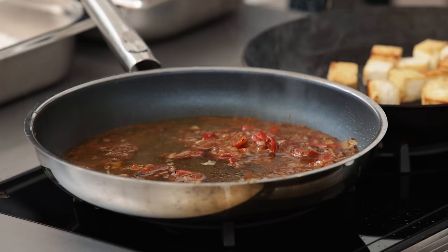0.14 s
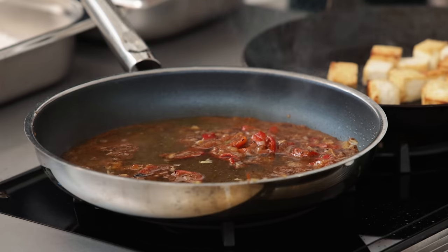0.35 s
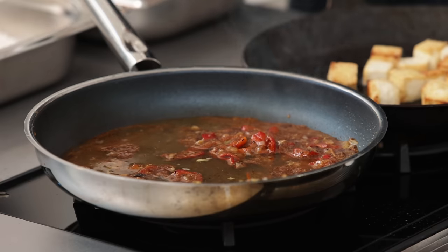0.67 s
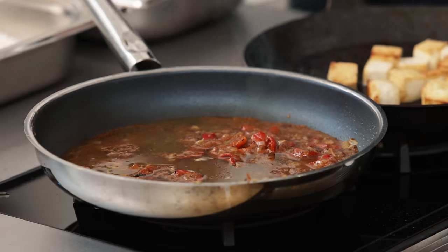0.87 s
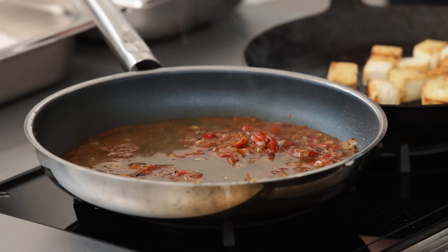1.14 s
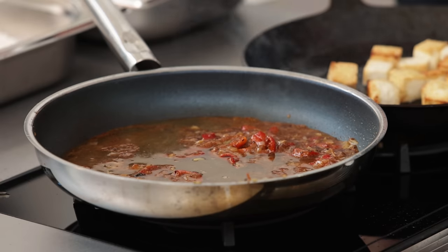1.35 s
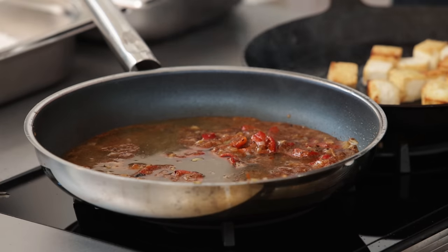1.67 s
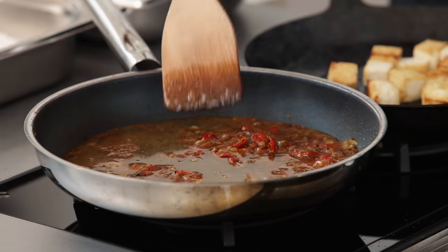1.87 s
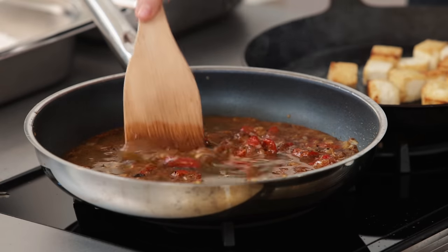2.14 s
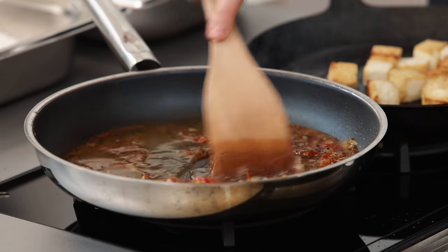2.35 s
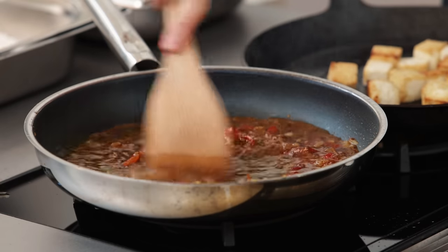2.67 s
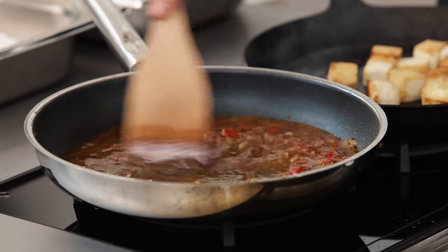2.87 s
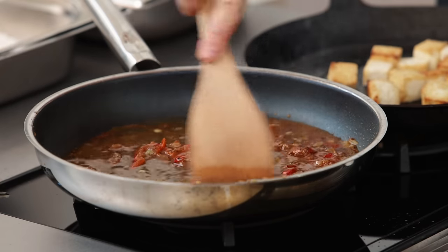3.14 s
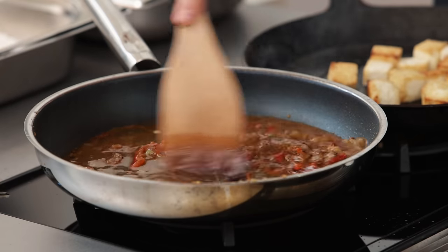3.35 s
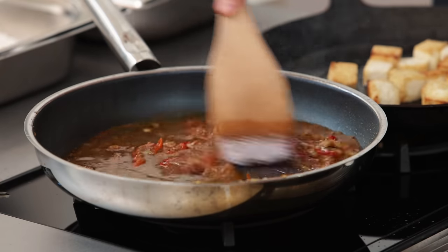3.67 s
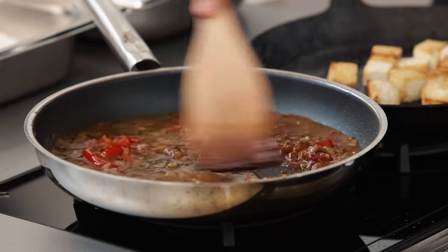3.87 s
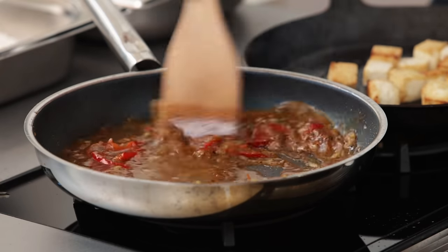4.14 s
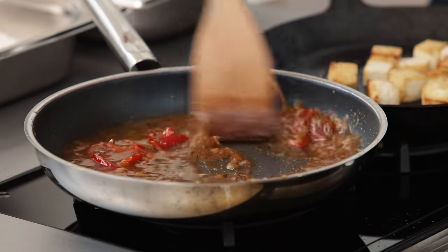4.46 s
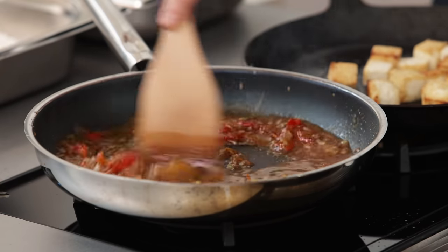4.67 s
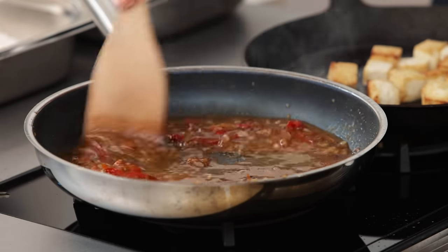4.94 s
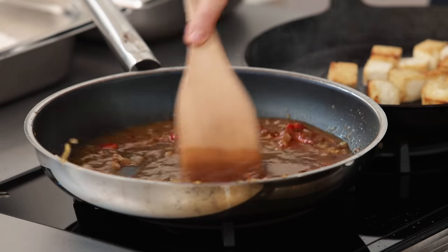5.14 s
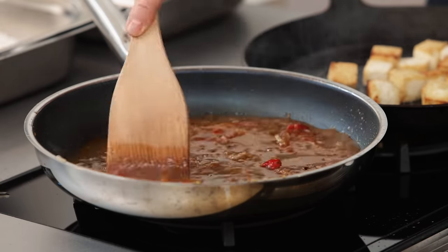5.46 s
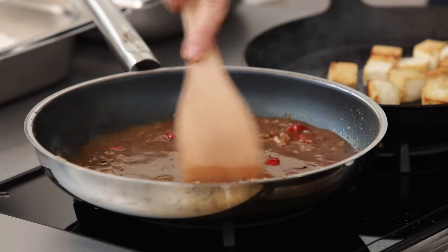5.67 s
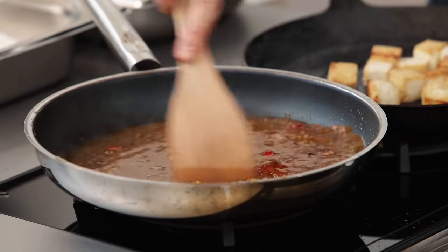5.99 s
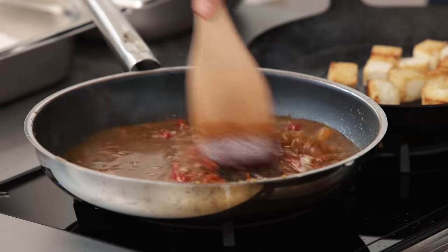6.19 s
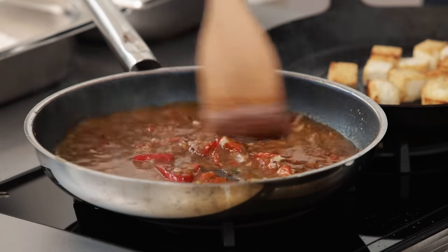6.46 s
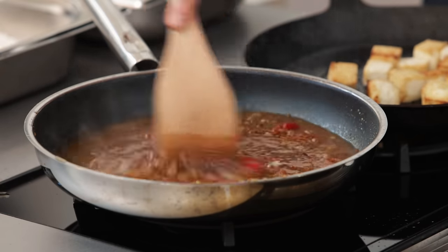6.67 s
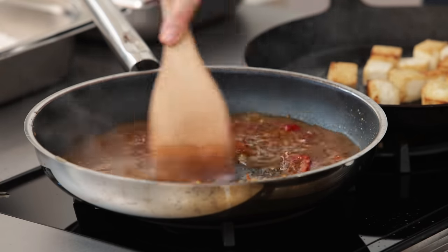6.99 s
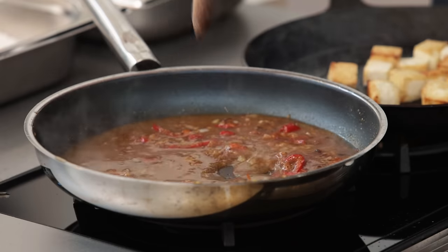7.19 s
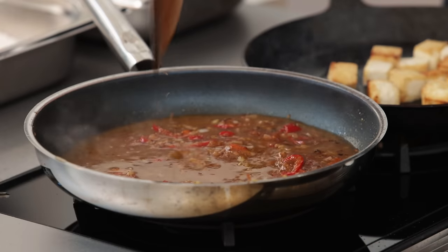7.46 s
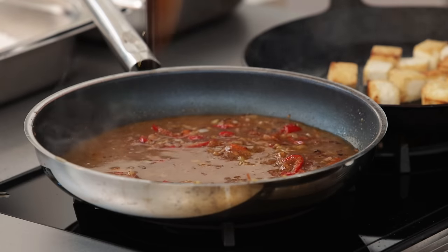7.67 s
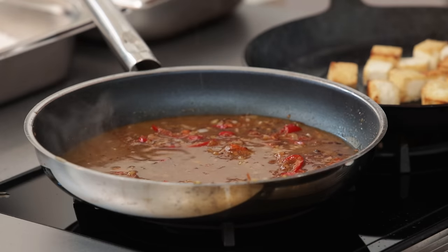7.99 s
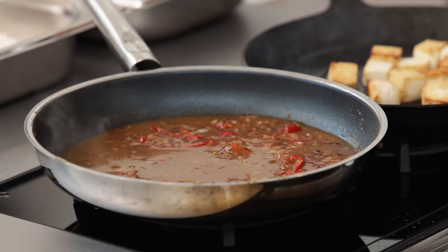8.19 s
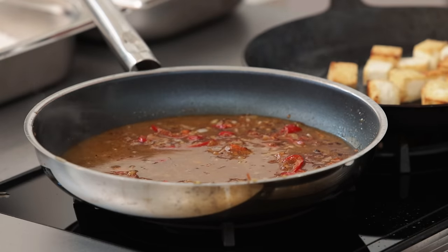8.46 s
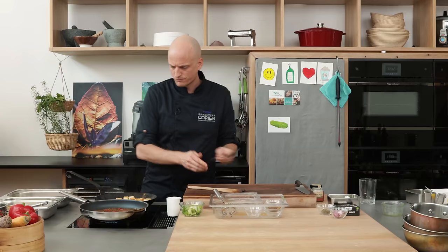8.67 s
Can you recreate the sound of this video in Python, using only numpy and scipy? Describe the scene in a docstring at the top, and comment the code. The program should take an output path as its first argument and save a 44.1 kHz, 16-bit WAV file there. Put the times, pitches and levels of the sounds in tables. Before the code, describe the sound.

Close pan sizzle: a brief cookware clatter, gentle simmering, then wet stirring strokes with sharp spatters and flaring crackle, ending with a light wooden knock.

```python
"""Kitchen, close to a frying pan: thick sauce simmers with fine fizz, crackling fat and bursting bubbles.
A wooden spatula stirs from 2 to 7 s and bares the hot base, where the sizzle flares up.
Cookware clatters at first; at the end the spatula is laid down.
Fizz, crackle, wash and bursts are shaped noise; gloops are gliding sines; knocks are decaying modes."""
import sys
import numpy as np
from scipy import signal
from scipy.fft import rfft, irfft
from scipy.io import wavfile
from scipy.ndimage import uniform_filter1d

SR = 44100
rng = np.random.default_rng(int(sys.argv[2]) if len(sys.argv) > 2 else 0)


def waveform_to_disk(signal):
    """Save audio, clipped to [-1, 1], as 16-bit WAV at the path in sys.argv[1]."""
    frames = np.transpose(np.atleast_2d(signal))
    scaled = np.clip(frames, -1, 1) * 32767
    samples = np.round(scaled).astype(np.int16)
    wavfile.write(sys.argv[1], SR, samples)


N = 389182
TIME = np.arange(N) / SR


def undb(db):
    """Decibels to gain."""
    return 10 ** (np.asarray(db) / 20)


def unit(x):
    """Scale to rms 1 along the last axis."""
    return x / np.sqrt(np.mean(x ** 2, axis=-1, keepdims=True))


def add(out, start_s, sound):
    """Mix a sound in at a time."""
    i = int(np.clip(start_s * SR, 0, N - 1))
    out[i:i + len(sound)] += sound[:N - i]


def band(x, lo_hz, hi_hz, order=2):
    """Butterworth band-pass."""
    sos = signal.butter(order, [lo_hz, hi_hz], "band", fs=SR, output="sos")
    return signal.sosfilt(sos, x)


def colour(x, points):
    """Minimum-phase filter with an (f/Hz, level/dB) outline; white noise keeps its power."""
    size = 4096
    hz, db = np.transpose(points)
    log_bins = np.log(np.fft.rfftfreq(size, 1 / SR) + 1)
    gain = unit(undb(np.interp(log_bins, np.log(hz), db)))
    cepstrum = irfft(np.log(gain))[:size // 2]
    cepstrum[1:] *= 2
    impulse = irfft(np.exp(rfft(cepstrum, size)))
    return signal.fftconvolve(x, impulse)[:len(x)]


def resonate(x, hz, q):
    """Pass short sounds (last axis) through one resonance."""
    f = np.fft.rfftfreq(x.shape[-1], 1 / SR) + 1
    return irfft(rfft(x) / (1 + 1j * q * (f / hz - hz / f)))


def fade(t, t60):
    """Exponential decay, 60 dB in t60 seconds."""
    return np.exp(-np.log(1000) * t / t60)


def walk(rate_hz):
    """Random drift, linear between normal knots; after N // 100 knots it holds the last value."""
    knots = rng.standard_normal(N // 100)
    return np.interp(TIME * rate_hz, np.arange(len(knots)), knots)


def clicks(rate_hz, spread_db):
    """Sparse one-sample snaps of uneven size, mean power near 1."""
    chance, size, sign = rng.random((3, N))
    heights = np.sign(sign - .5) * unit(undb(-spread_db * np.sqrt(size)))
    return (chance < rate_hz / SR) * heights * np.sqrt(SR / rate_hz)


def burst(t, t60, snap, grain_db=7.0):
    """A film tears: one sharp snap, then a ragged spit of droplets dying away."""
    shape = (len(t60), len(t))
    grain = unit(uniform_filter1d(rng.standard_normal(shape), size=14))
    ragged = unit(undb(grain_db * grain))
    spit = rng.standard_normal(shape) * ragged * fade(t, t60)
    spit[:, 1] += snap * rng.choice([-1, 1], len(t60))
    return spit


def kitchen(x, wet_db=-18, t60=0.46):
    """Faint, dull reflections from the hob and walls: decaying noise as impulse response."""
    t = TIME[:SR // 2]
    echo = band(rng.standard_normal(len(t)), 106, 10300, order=1) * fade(t, t60) * (t > .003)
    return x + undb(wet_db) * signal.fftconvolve(x, echo / np.linalg.norm(echo))[:N]


def blows(hits, modes, outline, ring_db, crack_db, crack_t60, tail_db, tail_t60, treble_hz, flutter):
    """Each blow rings the modes afresh, with a noisy crack and reflections; loose contact flutters the ring."""
    out, t = np.zeros(N), TIME[:SR]
    for s, db, treble_db in hits:
        ring = 0
        for hz, mode_db, t60 in modes:
            wobble = np.interp(t * 45, np.arange(64), rng.standard_normal(64))
            phase = 2 * np.pi * (hz * t + rng.random()) + flutter * wobble
            strength = undb(mode_db + 0.53 * rng.standard_normal())
            ring = ring + strength * np.sin(phase) * fade(t, t60)
        decay = undb(crack_db) * fade(t, crack_t60) + undb(tail_db) * fade(t, tail_t60)
        hit = undb(ring_db) * ring + colour(rng.standard_normal(len(t)) * decay, outline)
        treble = (undb(treble_db) - 1) * band(hit, treble_hz, 20000, order=1)
        add(out, s, undb(db) * (hit + treble))
    return out


# cookware knocks and rattles: (t/s, relative level/dB, treble gain/dB)
CLATTER_HITS = [(0.001, -15, 6), (0.024, -23.5, -18), (0.067, -28.5, -5), (0.094, -37, 11.5),
                (0.137, -29, -10), (0.154, -30, -14), (0.221, -25.5, 1.5), (0.274, -26, -4.5),
                (0.307, -26.5, -6), (0.349, -45, -16), (0.389, -40, -13)]
# cookware modes: (f/Hz, relative level/dB, t60/s)
COOKWARE_MODES = [(83, -12.5, 0.32), (135.8, -8, 0.31), (350, -31, 0.2), (377.4, 1, 0.42), (535, -14, .25),
                  (735, 1, 0.12), (895, -13, 0.36), (1050, -13, 0.44), (1360, 6, 0.059), (1410, 3, 0.09),
                  (1565, -11, 0.22), (1954, -4.5, 0.1), (2460, -3.5, 0.1), (2590, -13, 0.083),
                  (4570, -22, 0.15)]
# cookware noise outline: (f/Hz, relative level/dB)
CLANG_OUTLINE = [(30, -16), (130, 2), (230, 0), (400, 5), (800, -1.5), (1400, -6.5), (2600, -12),
                 (3600, -23.5), (7000, -33), (16000, -44)]


def clatter():
    """Struck cookware: long modes under a dull clang."""
    return blows(CLATTER_HITS, COOKWARE_MODES, CLANG_OUTLINE, ring_db=-7.5, crack_db=1.5, crack_t60=0.044,
                 tail_db=-14.5, tail_t60=1.0, treble_hz=1200, flutter=0.4)


# spatula knocks: (t/s, relative level/dB, treble gain/dB)
SPATULA_KNOCKS = [(8.5375, -30.5, 3), (8.6285, -21, 2.5), (8.6775, -28, -1), (8.697, -48, 10),
                  (8.705, -35.5, -3)]
# wood modes: (f/Hz, relative level/dB, t60/s)
WOOD_MODES = [(191, -16, 0.074), (402, -8, 0.083), (783, 4, 0.038), (1163, -1, 0.1), (1670, -10, 0.08),
              (2080, 9.5, 0.026), (2310, -5, 0.043), (3100, -1, 0.025), (3540, 4.5, 0.019),
              (4600, -4, 0.044), (5600, -11, .03), (6770, -19, .035)]
# knock noise outline: (f/Hz, relative level/dB)
CRACK_OUTLINE = [(50, -4.5), (200, -6.5), (800, -1.5), (1400, -5), (2200, 0), (4800, -6.5), (7200, -11),
                 (8200, -22), (16000, -36)]


def spatula():
    """Spatula laid down: short, damped wood modes and a sharp crack."""
    return blows(SPATULA_KNOCKS, WOOD_MODES, CRACK_OUTLINE, ring_db=-6.5, crack_db=7.0, crack_t60=0.016,
                 tail_db=-20.5, tail_t60=0.67, treble_hz=2520, flutter=.3)


# sauce heaves or is pushed by the blade: (t/s at the fastest, relative swish level/dB, churn level/dB)
STROKE_TABLE = [(1.75, -56, -72), (2.17, -58, -66), (2.58, -54.5, -55), (2.98, -55.5, -62),
                (3.35, -59, -66), (3.6, -62, -73), (4.17, -55.5, -68), (4.45, -65, -59), (4.78, -55, -64),
                (4.98, -58, -60), (5.3, -65, -72), (5.85, -64, -68), (6.499, -56.5, -69), (6.819, -55, -75),
                (7.2, -59, -66), (7.55, -56.5, -74)]
# blade in the pan: (from t/s, to t/s)
STIRRING_SPAN_S = (2.1, 6.6)
# wash and churn outlines: (f/Hz, relative level/dB)
SWISH_OUTLINE = [(100, -8), (450, -4.5), (680, 4), (900, -0.5), (1300, -18), (3000, -37)]
RUMBLE_OUTLINE = [(15, -23), (45, 4.5), (80, 1), (170, -13), (400, -13.5), (1500, -46)]
STROKE_HALF_S = .13  # to 1/e of the power
HOLLOW_HZ, HOLLOW_RISE_HZ = 670, 44.1  # air between blade and pan: at rest; added per stroke


def stirring(swish_db=-4, hollow_db=-5.0, width_hz=45, rest_swish_db=-68, rest_churn_db=-68, open_share=0.44):
    """Sauce washes round the blade, with a hollow that rises in each stroke, over the low churn of the boil."""
    s, swish_dbs, churn_dbs = np.transpose(STROKE_TABLE)
    speed = np.exp(-((TIME - s[:, None]) / STROKE_HALF_S) ** 2)
    swish = np.sqrt(undb(rest_swish_db) ** 2 + undb(swish_dbs) ** 2 @ speed)
    rumble = np.sqrt(undb(rest_churn_db) ** 2 + undb(churn_dbs) ** 2 @ speed)
    blade_in = (TIME > STIRRING_SPAN_S[0]) & (TIME < STIRRING_SPAN_S[1])
    blade = uniform_filter1d(np.where(blade_in, 1., open_share), size=SR // 3)
    hollow_hz = HOLLOW_HZ + HOLLOW_RISE_HZ * speed.sum(0)
    carrier = np.sin(2 * np.pi * np.cumsum(hollow_hz) / SR)
    hollow = blade * unit(band(rng.standard_normal(N), 1, width_hz) * carrier)
    wash = undb(swish_db) * colour(rng.standard_normal(N), SWISH_OUTLINE) + undb(hollow_db) * hollow
    churn = colour(rng.standard_normal(N), RUMBLE_OUTLINE) * rumble * undb(2.0 * walk(17))
    return wash * swish * undb(1.0 * walk(30)) + churn


# big slow bubbles and drips: (t/s, f/Hz at the start, level/dB, t60/s)
GLOOP_TABLE = [(.808, 85, -42, 0.096), (2.062, 298, -41, 0.062), (2.44, 105, -43, 0.11),
               (2.465, 85.6, -42.5, .15), (2.6, 120, -49, .15), (4.061, 450, -31, 0.04),
               (4.063, 666, -29.5, 0.0436), (4.079, 726, -29.5, 0.075), (4.081, 430, -33, 0.053),
               (4.083, 890, -44, 0.046), (7.732, 284, -38, 0.083)]


def gloops(glide_per_s=1.0, attack_s=0.0016):
    """Pockets of air ring and rise in pitch as they surface."""
    out, t = np.zeros(N), TIME[:SR // 4]
    for s, hz, db, t60 in GLOOP_TABLE:
        tone = np.sin(2 * np.pi * hz * t * (1 + glide_per_s * t))
        add(out, s, undb(db) * tone * fade(t, t60) * (1 - np.exp(-t / attack_s)))
    return out


# steam squirting out of the sauce: (t/s, length/s, f/Hz, level/dB)
SQUIRT_TABLE = [(2.477, 0.0095, 4240, -36), (4.805, 0.011, 3300, -39), (6.422, .006, 6030, -37),
                (6.449, 0.01, 6230, -38), (6.454, 0.016, 4320, -33.5), (6.466, 0.015, 5330, -34.5),
                (6.483, 0.012, 5140, -36)]


def squirts(q=7.9, sputter_db=5.0):
    """Steam forces a narrow channel and hisses: resonant noise, its level ragged in the first half only."""
    out = np.zeros(N)
    jet = rng.standard_normal(N) * unit(undb(sputter_db * walk(870)))
    for s, length_s, hz, db in SQUIRT_TABLE:
        i = int(s * SR)
        hiss = unit(resonate(jet[i:i + 2048], hz, q))
        swell = np.sin(np.pi * np.minimum(TIME[:len(hiss)] / length_s, 1))
        add(out, s, undb(db) * hiss * swell)
    return out


# loudest bursting bubbles: (t/s, level/dB, cavity f/Hz, plop/dB and spray/dB re level), before pops() trims
LOUD_POPS = [(0.552, -39.5, 7500, -9, -5), (0.6908, -45, 4570, 0.5, 5), (0.8145, -44.5, 4400, -1, 5.5),
             (1.0198, -38.5, 7500, -5.5, 3), (1.3236, -39.5, 3400, -16, -8), (1.3707, -31, 6260, -7.5, 0),
             (1.6945, -38.5, 5200, -0.5, 0.5), (1.7649, -35.5, 5330, -8.5, -6), (1.7808, -36, 6800, -4, 0),
             (1.7951, -33, 6400, -6.5, 1), (1.8739, -34, 5650, -3, 2), (1.9449, -35, 5900, -6, 2),
             (1.9638, -33.5, 5530, -8, -2), (1.9977, -30, 3800, -25, -29), (2.0443, -36, 7100, -4, 3),
             (2.1446, -26.0, 5160, -7, -1), (2.1793, -35.5, 3870, -5.5, 0), (2.269, -32, 3630, -4, -5),
             (2.288, -33.5, 5900, -15, -1), (2.3317, -29.5, 7200, -2, 1), (2.5537, -33.5, 6200, -2, 0),
             (2.6848, -28, 6540, -11, -5.5), (2.8826, -37, 6300, -6, -1), (2.9185, -38.5, 3980, -3.5, -4),
             (2.9895, -35, 6650, -6.5, 0), (3.0886, -39.0, 4500, -4.5, -2), (3.1865, -33, 6600, -4, -4),
             (3.3829, -35.5, 5200, -15, -6), (3.5151, -36, 6300, 2.5, 0.5), (3.5356, -40, 6350, -1, -6.5),
             (3.5529, -35.0, 4500, -4, -4), (3.7353, -36.0, 6500, -22, -14), (3.8933, -39.5, 5000, 0.5, 3),
             (4.2326, -29.5, 5250, -7, -2), (4.3371, -33.5, 5800, -7, -14), (4.3952, -41, 6300, 2.5, 9),
             (4.4381, -42.5, 7560, 6.5, 9), (4.4982, -33.5, 6200, -11, -10),
             (4.5229, -36.5, 6700, -9, -2.5), (4.7429, -32, 5900, -4.5, 0), (4.761, -31, 7000, -3.5, 4),
             (4.7774, -34, 6500, -13, -6), (4.798, -34, 6800, -8, -5), (4.8199, -30.5, 7000, 3.5, 5),
             (4.8443, -32.5, 7100, 0.5, 4), (4.9158, -34, 6850, -0.5, 4), (4.9566, -35.5, 2200, -5.5, -5),
             (5.0443, -33.5, 7120, 2, 3), (5.0497, -38, 4400, 4, 4), (5.0917, -29.5, 4380, 0.5, -10),
             (5.1415, -33.5, 5100, -3, 2), (5.1994, -27, 6600, -13, -10), (5.3255, -37.5, 5400, -1, -2),
             (5.3704, -37, 4740, 0.5, -2), (5.4682, -27.5, 5600, -4.5, -6.5),
             (5.5046, -25.5, 4130, -8.5, -10), (5.5871, -32.5, 5800, -1, -2), (5.6383, -35, 6600, -11.5, 4),
             (5.6575, -32, 6800, 0, -3), (5.7705, -32.5, 2170, -6.5, 0.5), (5.8372, -32, 6800, -13, -3),
             (5.8702, -34.5, 7300, -1.5, 5), (5.93, -34, 6200, -11, 2.5), (6.0257, -38.5, 3960, -8.5, 5),
             (6.1165, -39.5, 6500, -3.5, 8.5), (6.1825, -39.5, 5700, -1.5, 3.5),
             (6.2161, -33.5, 6600, -7, -8), (6.3116, -38, 4220, -2.5, -3), (6.3413, -41, 5060, 1, 10.5),
             (6.3882, -47.5, 5000, 5, 5.5), (6.4693, -34.5, 5680, -4, -11), (6.6761, -35, 4500, -3, -7),
             (6.7691, -41.5, 5600, 3.5, 4), (6.7943, -38, 4400, -12, 3), (7.0652, -36, 6000, -12, -1.5),
             (7.1998, -38, 5530, -17, -8), (7.4005, -36.5, 4270, -12, -9), (7.4775, -36.0, 5600, -10, -13),
             (7.6812, -36.5, 6000, -2.5, -3), (8.0427, -41.5, 7240, -0.5, 11.5),
             (8.4603, -37, 7600, -6, -4), (8.7798, -36, 6500, -7, -1)]


def pops(bubbles, t60=0.011, snap=3.5, q=4, plop_hz=800, splash=1.52, splash_hz=1900,
         plop_trim_db=1.5, ring_trim_db=1.0, spray_trim_db=1.5, cavity_lo_hz=2000):
    """Each bubble lets out a puff, rings its cavity and throws spray."""
    s, db, hz, plop_db, spray_db = np.transpose(bubbles)[:, :, None]
    out, t = np.zeros(N), np.arange(1024) / SR
    share = np.sqrt(.005 * SR / len(t))  # refers levels to 5 ms
    tear = burst(t, np.full(s.shape, t60), snap)
    puff = band(t * np.exp(-t * 2 * np.pi * plop_hz), 97, 6100, order=1)
    body = unit(unit(puff) + splash * unit(band(tear, 265, splash_hz)))
    cavity = unit(band(resonate(tear, hz, q), cavity_lo_hz, 5440))
    mist = unit(band(resonate(tear, 8900, 0.49), 4630, SR / 2 - 1, order=3))
    mix = undb(plop_db + plop_trim_db) * body
    mix = mix + undb(ring_trim_db) * cavity
    mix = mix + undb(spray_db + spray_trim_db) * mist
    for start_s, sound in zip(s[:, 0], share * undb(db) * mix):
        add(out, start_s, sound)
    return out


SMALL_RATE_HZ, SMALL_FLARE_RATE_HZ = 5, 18  # covered base; extra on bare metal
SMALL_DB, SMALL_FLARE_DB, SMALL_SPREAD_DB = -45, 7, 2.5  # before pops() trims; extra on bare metal; scatter
SMALL_HZ, SMALL_SPREAD_OCTAVES = 5330, 0.47
SMALL_PLOP_DB, SMALL_SPRAY_DB = -5.5, 3.5  # re level, before pops() trims


def small_bubbles(heat):
    """Small bubbles burst at random, more and louder on bare metal; returns rows for pops()."""
    count = 400
    when, chance = rng.random((count, 2)).T
    size, pitch, plop, spray = rng.standard_normal((count, 4)).T
    hot = heat[(when * (N - 1)).astype(int)]
    level_db = SMALL_DB + SMALL_FLARE_DB * hot + SMALL_SPREAD_DB * size
    hz = SMALL_HZ * 2 ** (SMALL_SPREAD_OCTAVES * pitch)
    plop_db = SMALL_PLOP_DB + SMALL_SPREAD_DB * plop
    spray_db = SMALL_SPRAY_DB + SMALL_SPREAD_DB * spray
    rows = np.c_[when * N / SR, level_db, hz, plop_db, spray_db]
    return rows[chance * count < (SMALL_RATE_HZ + SMALL_FLARE_RATE_HZ * hot) * N / SR]


# sauce runs onto hot metal, sizzle flares and dies down: (t/s, level/dB on the simmer scale, t60/s)
FLARE_TABLE = [(.72, -55, 2.5), (1.27, -51, .7), (1.68, -54, 3.6), (2.1, -56, 5), (2.42, -53, 1.23),
               (2.93, -54, 2.2), (3.45, -54, 3), (4.05, -50.5, 3.8), (4.38, -51, 4.5), (4.65, -38, 1.95),
               (4.98, -44.5, 3), (5.28, -46, 4.8), (5.7, -54, 1.9), (6.06, -54, 3), (6.38, -52, 2.9),
               (6.68, -54, 4.7), (7.022, -59, 0.76), (7.33, -54, 1.7), (7.93, -57.5, 2.6),
               (8.6, -55.5, 2.2)]
FLARE_ATTACK_S = .11
SIMMER_DB, SIMMER_START_DB, SIMMER_RISE_S = -54, -6.5, 0.75  # steady; start re steady; time to come up


def sizzle_rise():
    """Frying level in dB re steady simmer: each flare swells quickly and boils away."""
    power = undb(SIMMER_DB + SIMMER_START_DB * np.maximum(1 - TIME / SIMMER_RISE_S, 0)) ** 2
    for s, db, t60 in FLARE_TABLE:
        swell = np.clip((TIME - s) / FLARE_ATTACK_S, 0, 1)
        decay = fade(np.maximum(TIME - s - FLARE_ATTACK_S, 0), t60)
        power = power + (undb(db) * swell * decay) ** 2
    return 10 * np.log10(power) - SIMMER_DB


# crackle outline: (f/Hz, relative level/dB)
CRACKLE_OUTLINE = [(80, 8), (300, 8), (1000, 10), (1450, 8.5), (2300, 9.5), (3000, 2.5), (4600, 0),
                   (6600, 0), (8000, -2.5), (10000, 0.5), (13000, -6), (16000, -4)]


def crackle(heat, calm_rate_hz=260, flare_rate_hz=380, range_db=21, pitch_hz=7000, octaves=2.81,
            q=5.2, broad=0.31, short_t60=0.0018, extra_t60=0.0098):
    """Small bursts at random, most of them faint, each with its own pitch; more on the bare hot base."""
    count = 6000
    when, chance, size, length, pitch = rng.random((count, 5)).T
    rate_hz = calm_rate_hz + flare_rate_hz * heat
    t = np.arange(384) / SR
    hz = pitch_hz * 2 ** (octaves * (np.sqrt(pitch) - .6))
    tears = burst(t, short_t60 + extra_t60 * length[:, None], snap=2.85)
    grains = unit(unit(resonate(tears, hz[:, None], q)) + broad * unit(tears))
    muffling = np.sqrt(np.minimum(hz / pitch_hz, 1))  # sauce muffles the low ones
    grains *= unit(undb(-range_db * np.sqrt(size)) * muffling)[:, None]
    out = np.zeros(N)
    chosen = chance * count < rate_hz[(when * (N - 1)).astype(int)] * N / SR
    for k in np.flatnonzero(chosen):
        add(out, when[k] * N / SR, grains[k])
    return colour(out / np.sqrt(rate_hz * len(t) / SR), CRACKLE_OUTLINE)


# fizz outlines, covered base and bare metal: (f/Hz, relative level/dB)
SIMMER_OUTLINE = [(59, -38), (100, -4), (583, -2.5), (970, -12), (1760, -7.5), (2630, -9.5), (5080, -7),
                  (5900, -8.5), (6840, -9), (10700, -11.5), (13200, -8.5), (15000, -25), (16000, -32.5)]
FLARE_OUTLINE = [(100, -15), (300, -10), (900, -0.5), (1500, -27), (2400, -4), (3100, -7), (4900, -6),
                 (6800, 0), (8100, -4), (10200, 1), (11300, -2), (12500, 3), (16000, -7)]


def fizz(heat, grain_db=0.5, flare_db=6.0, hiss=0.15, gust_db=4.0):
    """Countless tiny steam bubbles; where sauce meets bare metal they snap, bright and in gusts."""
    steam = unit(rng.standard_normal(N) * undb(grain_db * walk(1100))) * undb(0.69 * walk(25))
    gusts = unit(undb(gust_db * np.tanh(walk(140))))
    snaps = unit(clicks(1700, 30) + hiss * rng.standard_normal(N)) * gusts
    calm = np.sqrt(1 - heat) * colour(steam, SIMMER_OUTLINE)
    return calm + np.sqrt(heat) * undb(flare_db) * colour(snaps, FLARE_OUTLINE)


BARE_DB = 12  # rise over the simmer at which the base counts as bare
CRACKLE_DB, CRACKLE_DB_PER_DB = -46.5, 1  # at steady simmer; growth with the rise


def frying(rise_db, heat):
    """Fizz and crackle grow together with the sizzle."""
    fine = fizz(heat) * undb(SIMMER_DB + rise_db)
    return fine + crackle(heat) * undb(CRACKLE_DB + CRACKLE_DB_PER_DB * rise_db)


def scene():
    """The pan, the stirring and the things handled around it."""
    rise_db = sizzle_rise()
    heat = np.clip(rise_db / BARE_DB, 0, 1)  # 0 covered base, 1 bare hot metal
    handled = clatter() + spatula() + stirring()
    bubbling = gloops() + squirts() + pops(LOUD_POPS) + pops(small_bubbles(heat))
    return kitchen(handled + bubbling + frying(rise_db, heat))[None]


def record(dry):
    """Steep elliptic low-pass at 15.9 kHz."""
    return signal.sosfilt(signal.ellip(10, .2, 70, 15900, fs=SR, output="sos"), dry)


dry = scene()
out = record(dry)
waveform_to_disk(out)
```